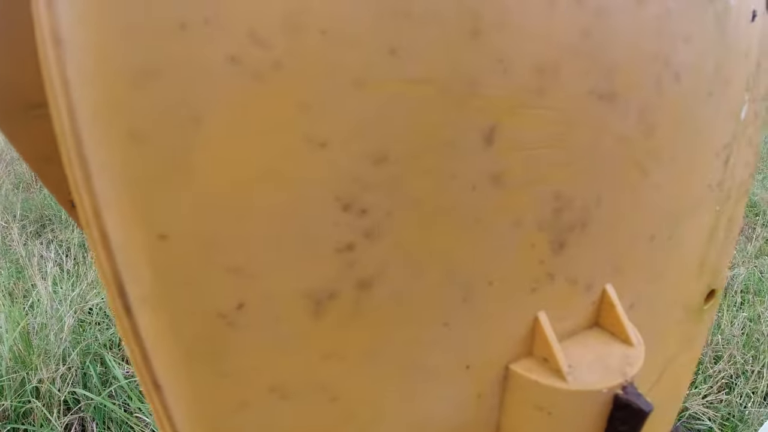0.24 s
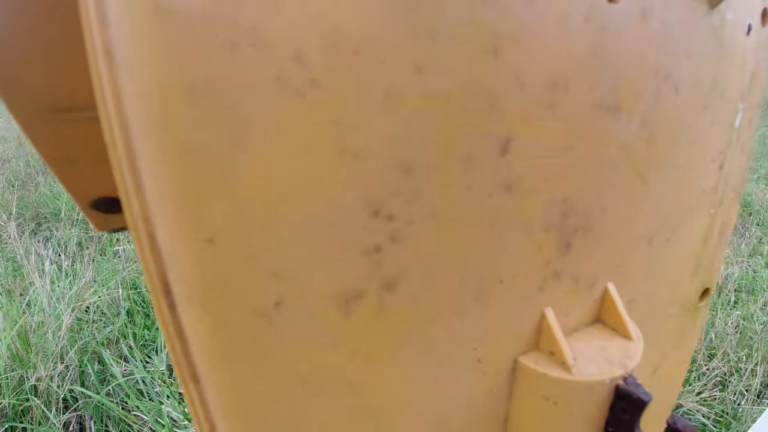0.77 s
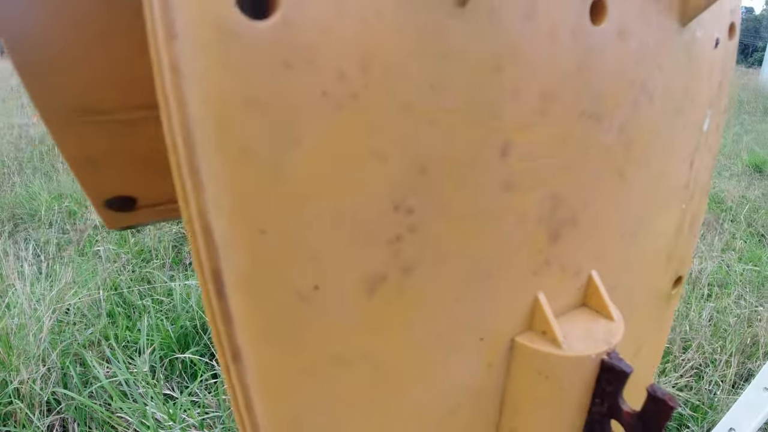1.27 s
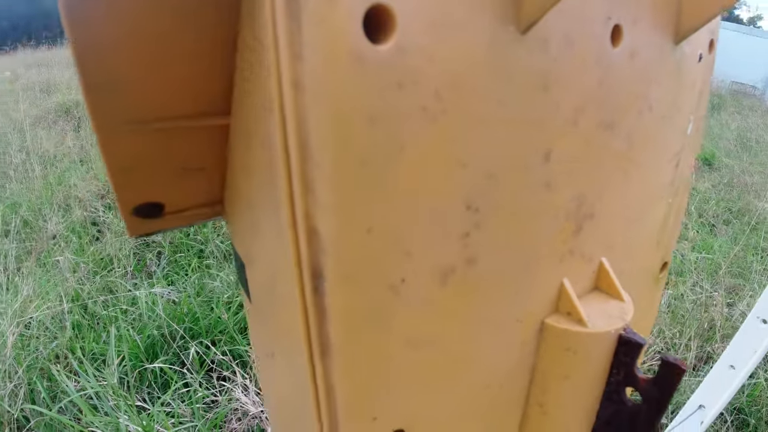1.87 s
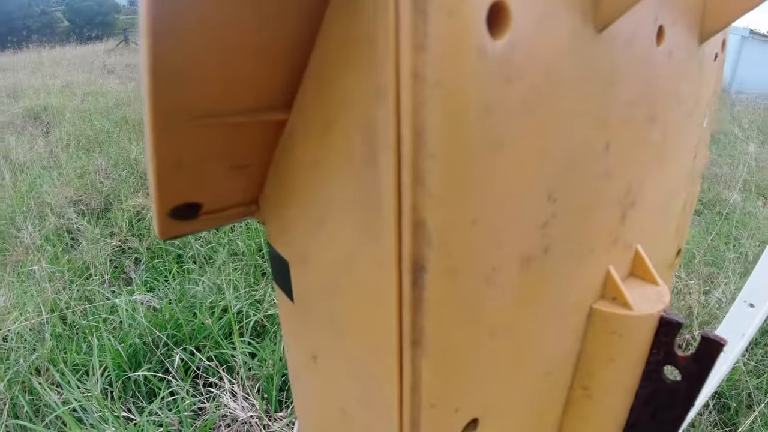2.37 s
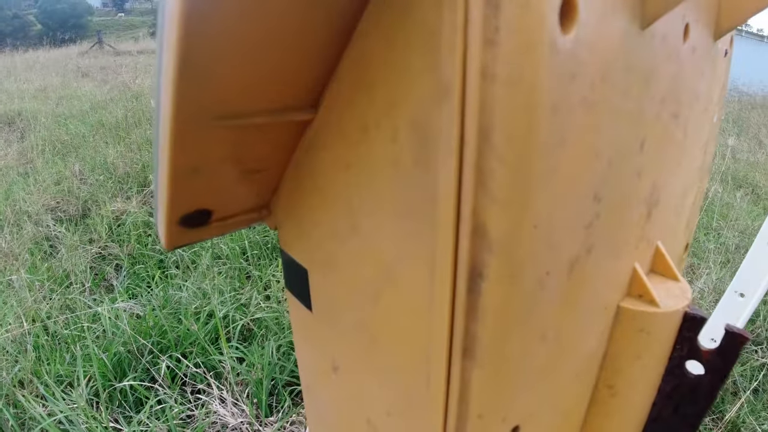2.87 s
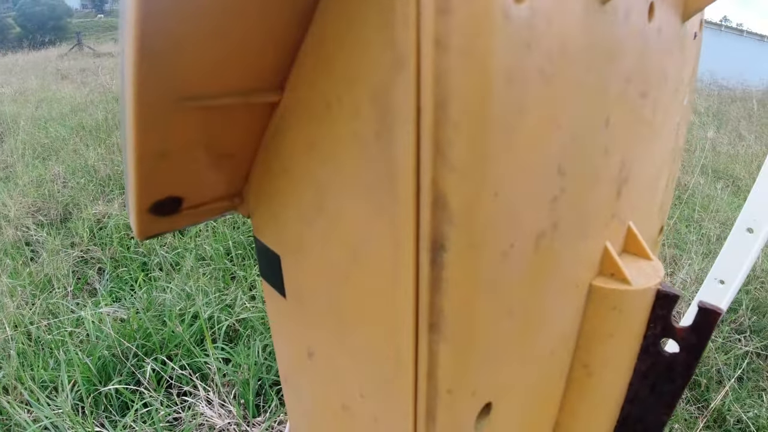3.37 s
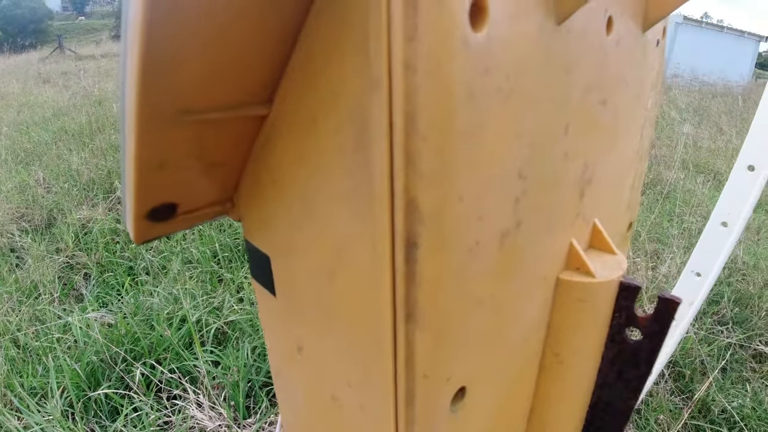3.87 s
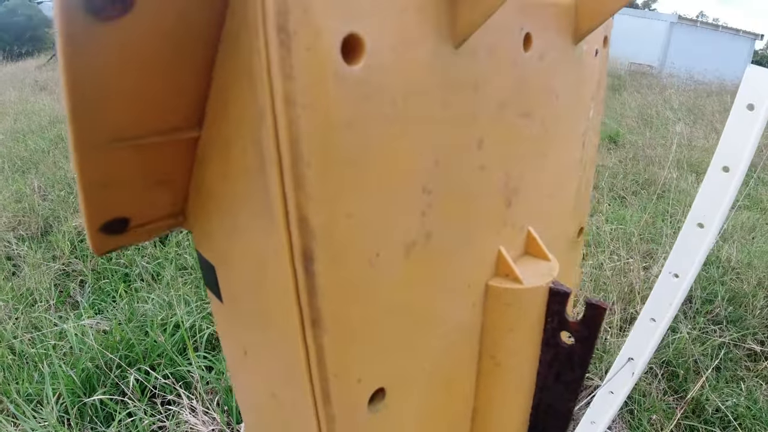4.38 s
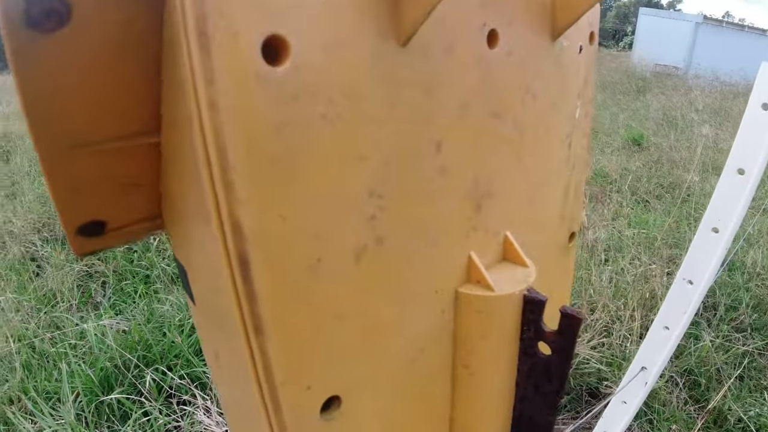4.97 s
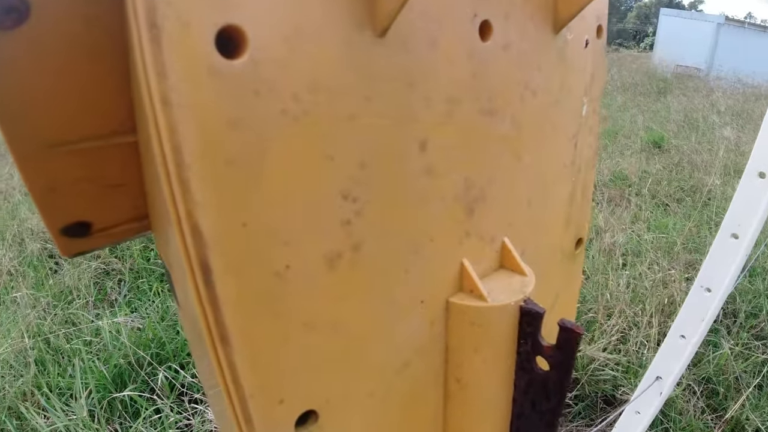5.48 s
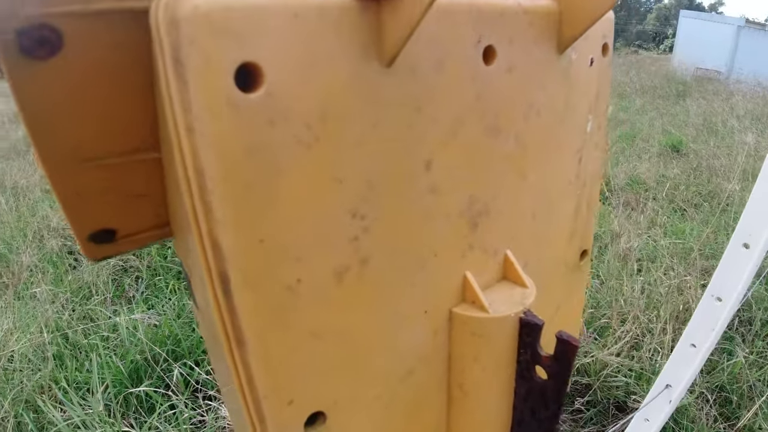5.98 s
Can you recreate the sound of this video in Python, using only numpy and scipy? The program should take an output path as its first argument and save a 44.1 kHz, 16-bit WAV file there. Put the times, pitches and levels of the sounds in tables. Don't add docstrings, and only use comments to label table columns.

```python
import sys
import numpy as np
from scipy import signal
from scipy.fft import rfft, irfft, next_fast_len
from scipy.io import wavfile
from scipy.ndimage import map_coordinates

SR = 44100
rng = np.random.default_rng(int(sys.argv[2]) if len(sys.argv) > 2 else 0)


def inscribe(sig):
    pcm = np.round(np.clip(np.atleast_2d(sig).T, -1, 1) * 32767)
    wavfile.write(sys.argv[1], SR, pcm.astype(np.int16))


def ratio(d):
    e = np.asarray(d, float) / 20
    return 10 ** e


N = 275184


def unit(x):
    return x / np.sqrt(np.mean(x ** 2) + 1e-20)


def curves(rows):
    s, *cols = np.transpose(rows)
    return [np.interp(np.arange(N) / SR, s, c) for c in cols]


def wobble(rate):
    knots = rng.standard_normal(int(N * rate / SR) + 4)
    return map_coordinates(knots, [np.arange(N) * rate / SR])


def filtered(x, response):
    m = next_fast_len(N + 8192)
    hz = np.fft.rfftfreq(m, 1 / SR) + 1e-3
    return irfft(rfft(x, m) * response(hz), m)[:N]


def band(centre_hz, width_hz):
    noise = rng.standard_normal(N)
    return unit(filtered(noise, lambda f: 1 / (1 + ((f - centre_hz) / width_hz) ** 4)))


def add(out, s, sound):
    part = out[round(s * SR):][:len(sound)]
    part += sound[:len(part)]


# (f/Hz, level/dB per Hz)
RUSTLE = [(60, -23.5), (120, -6.5), (220, -13), (300, -18.5), (570, -19), (780, -24.5), (980, -21.5),
          (1300, -29.5), (2200, -25.5), (2800, -34), (5200, -42), (6000, -43.5), (12600, -51),
          (13200, -81.5)]
# (f/Hz, width/Hz, level/dB)
ENGINE = [
    (43.6, 4.9, -53),
    (101.5, 11, -53),
    (131, 9.2, -71),
]


def paddock():
    hz, db = np.transpose(RUSTLE)
    noise = rng.standard_normal(N)
    rustle = unit(filtered(noise, lambda f: ratio(np.interp(np.log(f), np.log(hz), db))))
    hum = sum(ratio(level + 1.2 * wobble(2.0)) * band(c, w) for c, w, level in ENGINE)
    sway_db = 0.9 * wobble(5.8) + 0.6 * wobble(1.1)
    return ratio(-51.0 + sway_db) * rustle + hum


# (t/s, level/dB)
GUSTS = [(0.0, -35), (1.08, -36.5), (2.55, -36), (2.64, -20), (2.92, -32), (4.0, -39), (4.15, -24),
         (4.54, -34.5), (4.68, -21), (4.97, -38.5), (5.07, -27.5), (5.58, -33), (5.7, -16), (6.05, -37.5),
         (6.24, -34.5)]
# (t/s, f/Hz, level/dB, t60/s)
BUMP = [
    (4.072, 125.3, -10.5, 0.14),
    (4.091, 65.5, -6.5, 0.074),
    (4.099, 37.7, -16, 0.66),
]


def wind():
    buffet_db, = curves(GUSTS)
    rumble_db = -46 + 0.71 * (buffet_db - buffet_db.mean())
    out = ratio(buffet_db) * band(10.7, 9.6) + ratio(rumble_db) * band(43, 20)
    t = np.arange(SR // 2) / SR
    for s, hz, db, t60 in BUMP:
        onset = 1 - np.exp(-t / 0.0061)
        add(out, s, ratio(db - 60 * t / t60) * onset * np.sin(2 * np.pi * hz * t))
    return out


def sputter(modes, grain_db):
    def housing(f):
        return sum(ratio(db) / (1 + ((f - c) * t60 / 2) ** 2) for c, db, t60 in modes)
    grainy = ratio(grain_db * wobble(170)) * rng.standard_normal(N)
    return unit(filtered(grainy, housing))


def stray_grains(count, spread_db, cycles):
    when, pitch, size = rng.random((count, 3)).T[:, :, None]
    turns = 2600 * 3.2 ** pitch * np.arange(SR // 100) / SR
    level = ratio(-11 * pitch - spread_db * np.log(size + 1e-3))
    grains = level * turns * np.exp(-turns / cycles) * np.sin(2 * np.pi * turns)
    place = (when * N).astype(int) + np.arange(turns.shape[1])
    return unit(np.bincount(place.ravel(), grains.ravel(), N)[:N])


# (t/s, level/dB)
FAINT_CREAK = [
    (0.0, -42.5),
    (0.29, -54),
    (6.12, -58),
    (6.24, -56),
]


def faint_creak(crackle):
    linger = ratio(-60 * np.arange(SR // 3) / SR / 0.082)
    busy = np.sqrt(np.abs(signal.fftconvolve(crackle ** 2, linger / linger.sum())[:N]))
    floor_db, = curves(FAINT_CREAK)
    level = ratio(floor_db - 7.5 + 3.4 * wobble(46)) + ratio(-39.5) * busy
    hiss = ratio(-6.5) * sputter(RIBS[2:], grain_db=3.5)
    hiss = hiss + sputter(EDGES[:5], grain_db=6)
    hiss = hiss + ratio(-15 + 1.3 * wobble(1.5)) * sputter(EDGES[5:], grain_db=9.0)
    return level * hiss + ratio(floor_db - 13) * stray_grains(count=250, spread_db=0.5, cycles=1.6)


# (t/s, peak level/dB, sizzle of ribs and edges/dB re peak)
DEEP_CREAKS = [(.0204, -13, -3.5), (.1015, -10.5, -11.5), (.157, -11, 1.5), (.1791, -8, -8),
               (.1847, -7.5, -17), (.269, -14, -11), (.2919, -13.5, -1.5), (.4987, -16.5, 6),
               (.6758, -8.5, -8.5), (.6973, -22, -6.5), (1.0515, -22.5, 1.5), (1.1829, -14, 1),
               (1.6397, -17.5, 2.5), (1.6608, -12.5, -4.5), (1.6757, -5.5, -14.5), (1.6822, -15.5, -6),
               (2.6272, -42, 2), (2.8149, -16, -3.5), (3.281, -12, 0), (4.1046, -6.5, -5.5),
               (4.2328, -6.5, -14), (4.2723, -35, -5), (4.5684, -18.5, -1), (4.6157, -11.5, -4.5),
               (5.1969, -13, -3.5), (5.2071, -19, -15), (6.0141, -7.5, -6.5), (6.2105, -10, -6.5)]
# (t/s, peak level/dB, sizzle of ribs and edges/dB re peak)
CORNER_CREAKS = [(.0646, -19, 1.5), (.2008, -11, -4.5), (.5345, -14.5, -4), (.681, -11, -6.5),
                 (.7268, -14, -7), (1.232, -11.5, -4.5), (2.6366, -7, -12.5), (2.7766, -18, -9.5),
                 (3.1173, -17, -7), (3.1458, -23.5, -4.5), (4.0134, -13.5, -10.5), (4.1092, -7, -10.5),
                 (4.1243, -12, -2), (4.172, -12.5, -7), (4.1802, -11.5, -12), (4.2397, -29, 7),
                 (4.2842, -4.5, -9.5), (4.5411, -24, -15), (4.5455, -10.5, -9.5), (4.5583, -8.5, -9),
                 (4.631, -17, -1), (4.7187, -21, -6), (4.9598, -20.5, 1.5), (5.1506, -7.5, -9.5),
                 (5.2456, -12.5, -11.5), (5.2928, -12.5, -11), (5.3036, -14.5, 0), (5.4437, -23.5, 2),
                 (5.6321, -16.5, -9.5), (6.0536, -7.5, -4.5)]
# (t/s, peak level/dB, sizzle of ribs and edges/dB re peak)
FRONT_CREAKS = [(.0493, -11, -16), (.1901, -6, -12), (.2103, -2.5, -16), (.4348, -10.5, -9.5),
                (.4407, -6, -17), (.4478, -13.5, -8), (.4542, -21, -10), (.4668, -13, -1),
                (.4823, -13, -9.5), (.4902, -13.5, -5), (.543, -7, -17), (.5864, -14.5, -5.5),
                (.7381, -9, -12), (.8147, -16, -6.5), (.8251, -12, -11.5), (1.244, -10, -10.5),
                (1.2575, -9.5, -10), (1.8593, -12.5, -23), (1.8667, -17.5, -9), (1.8759, -26, -21),
                (2.0765, -14, -16.5), (2.3741, -7.5, -19), (2.393, -20.5, -8.5), (2.4738, -14.5, -12.5),
                (2.487, -14.5, -19), (2.5002, -24, -16), (2.9117, -5.5, -7.5), (2.9316, -31, -7),
                (4.2914, -22.5, -1), (4.3199, -10, -12.5), (4.7874, -11, -19), (4.794, -13, -8.5),
                     (4.8878, -7, -10), (4.8936, -16.5, -6), (4.952, -9.5, -11), (4.976, -9, -14),
                     (5.07, -13, -11), (5.4115, -16.5, -8), (5.423, -7, -4.5), (5.4297, -20.5, -4),
                     (5.4341, -7, -11.5), (5.4371, -13, -3.5), (5.4496, -19.5, -4), (5.456, -30, -12),
                     (5.4649, -12.5, -8), (5.7068, -12, -12.5), (5.7245, -30, -4), (5.9639, -8.5, -19),
                     (5.9798, -30, 3), (6.0282, -13.5, -11)]
# (t/s, peak level/dB, knock of the walls/dB re peak)
RIB_CREAKS = [(.0339, -28, -19), (0.1362, -28, -16), (.1947, -28, -10), (0.3485, -16.5, -16),
              (.3761, -40, -12), (.4106, -38, -17), (0.473, -21, -16), (0.6019, -14.5, -5),
              (.771, -19, -29), (1.0724, -26, -13), (1.105, -32, -15), (1.1262, -23.5, -5),
              (1.2, -22, -18), (1.5653, -17.5, -12.5), (1.5754, -20.5, -9), (2.142, -33.5, -14),
              (2.399, -30, -8), (2.6674, -20, -10), (2.9532, -14, -26), (3.1626, -17.5, -32),
              (3.2037, -17, -20), (3.3363, -30.5, -27), (3.8765, -40.5, -27),
              (4.0567, -20, -7), (4.0619, -32, -23), (4.187, -21.5, -3), (4.2485, -19, -10),
                   (4.3848, -19, -20.5), (4.5327, -22.5, -10), (4.6219, -30, 8), (4.6377, -23, -20),
                   (4.8223, -23.5, -20), (4.922, -15.5, -15), (4.9634, -17.5, -11), (5.176, -16.5, -5.5),
                   (5.214, -18.5, -6), (5.417, -23, 4.5), (5.4723, -21.5, -8), (5.663, -28.5, -11),
                   (5.752, -18, -8), (5.766, -16, -5), (5.774, -25, -20), (5.8473, -20, -11.5),
                   (6.0647, -19.5, -2.5)]
# (t/s, peak level/dB)
EDGE_TICKS = [(.6587, -28), (.9186, -41.5), (2.2362, -47), (2.2739, -36.5), (2.322, -41), (2.9413, -44),
              (3.8754, -32.5), (3.9816, -49), (4.0845, -35.5), (4.0935, -39.5), (5.5905, -43),
              (5.6448, -32), (5.8164, -39), (6.121, -57)]


def slips():
    deep, corner, front = (-1.5, -4, -3.5, -10), (-3.5, -0.5, -1, -9.5), (-13, -0.5, 0, -9.5)
    ribbed, edge = (-6, 2.5, 2, -13.5), (-14, -19, -10.5, -1.5)
    front_creaks = FRONT_CREAKS
    found = []
    for rows, spread in [(DEEP_CREAKS, deep), (CORNER_CREAKS, corner), (front_creaks, front)]:
        for s, db, sizzle_db in rows:
            found.append((s, db + np.add(spread, [0, 0, sizzle_db, sizzle_db])))
    for s, db, knock_db in RIB_CREAKS:
        found.append((s, db + np.add(ribbed, [knock_db, knock_db, 0, 0])))
    for s, db in EDGE_TICKS:
        found.append((s, db + np.array(edge)))
    return found


def rings(count, modes, slip_s, split, cycles, crowd, crowd_db, snap):
    t = np.arange(SR // 7) / SR
    hz, db, t60 = np.repeat(np.transpose(modes), 6, axis=1)[:, :, None]
    near = np.resize([[-split], [split], [-crowd], [crowd], [-2.3 * crowd], [2.267 * crowd]], hz.shape)
    weak = crowd_db * np.resize([[0], [0], [1], [1], [1], [1]], hz.shape)
    swell = (1 - np.exp(-t * hz / cycles)) ** 2
    shapes = ratio(db + weak - 60 * t / t60) * swell * np.sin(2 * np.pi * hz * (1 + near) * t)
    shapes *= np.resize([[1], [1], [-1], [1], [1], [-1]], hz.shape)
    strengths = ratio(2.4 * rng.standard_normal((count, len(hz))))
    life = t[:SR // 30] / slip_s
    drive = rng.standard_normal((count, len(life))) * np.sqrt(life) * np.exp(-life)
    drive += snap * np.sqrt(slip_s * SR) * (life == 0)
    ring = signal.fftconvolve(strengths @ shapes, drive, axes=1)[:, :len(t)]
    return ring / np.abs(ring).max(axis=1, keepdims=True)


# (f/Hz, level/dB, t60/s)
SHELL = [(207.5, -14, 0.11), (279, -24, 0.081), (374, -9, 0.12), (495, -16, 0.11), (560.2, -1, 0.11),
         (659.4, -2, 0.1)]
PANEL = [(923, -5, 0.066), (965.7, 3, 0.052), (1035.8, -4.5, 0.066), (1134, -20, 0.078), (1196, -16, 0.089),
         (1488, -19.5, 0.064)]
RIBS = [(1556, -9, 0.059), (1700, -12, 0.023), (1855.5, 1.5, 0.019), (1998, 4.5, 0.02), (2120, -5, 0.036),
        (2507, -12, 0.018), (2595, -15, 0.01)]
EDGES = [(3240, -14.5, 0.044), (3257, -1.4, 0.021), (3688, -4, 0.019), (4308, -8.5, .021),
         (4878, -6.5, 0.013), (5490, -17.5, .017), (6220, -20, 0.018), (6990, -19, 0.013),
         (7350, -21, 0.022), (8340, -22.5, 0.013), (8780, -25, 0.0047), (10710, -30.5, .013),
         (12200, -34.5, 0.0093)]


def creaks():
    events = slips()
    n = len(events)
    shell = rings(n, SHELL, slip_s=0.00081, split=0.012, cycles=0.27, crowd=.05, crowd_db=-18, snap=.45)
    panel = rings(n, PANEL, slip_s=.0018, split=0.012, cycles=0.92, crowd=.045, crowd_db=-14, snap=0.26)
    ribs = rings(n, RIBS, slip_s=0.0014, split=0.013, cycles=0.94, crowd=.035, crowd_db=-8, snap=0.099)
    edges = rings(n, EDGES, slip_s=0.00096, split=0.0084, cycles=1.2, crowd=.03, crowd_db=-8, snap=.15)
    parts = [ratio(0.2) * shell, ratio(1.43) * panel, ratio(1.86) * ribs, ratio(2.5) * edges]
    out = np.zeros(N)
    for k, (s, levels) in enumerate(events):
        add(out, s, sum(ratio(db) * part[k] for db, part in zip(levels, parts)))
    return out


def cavity(x):
    t = np.arange(SR // 8) / SR
    tails = rng.standard_normal((2, len(t))) * ratio(-60 * t / 0.041)
    a, b = signal.fftconvolve(x[None], tails / np.linalg.norm(tails[0]), axes=1)[:, :N]
    turn = 2 * wobble(9)
    return x + ratio(-8.5) * (np.cos(turn) * a + np.sin(turn) * b)


# (t/s, length/s, start f/Hz, end f/Hz, level/dB)
WHISTLES = [
    (1.712, 0.026, 5200, 5350, -61),
    (1.728, .016, 5000, 3200, -55),
    (1.74, 0.016, 3020, 3080, -43),
    (2.15, 0.15, 2990, 3100, -62),
    (2.275, 0.13, 3220, 3290, -56),
    (2.31, 0.08, 4440, 4450, -58.5),
    (3.645, 0.023, 2930, 3030, -53),
    (3.94, 0.026, 2740, 2970, -53),
]


def wildlife():
    out = np.zeros(N)
    calls = list(WHISTLES)
    beats = np.arange(.155, N / SR, .2387)
    chance = rng.standard_normal((30, 2))
    for s, (late, loud) in zip(beats, chance):
        calls.append((s + .012 * late, .035, 14050, 14150, -72 + 5.5 * loud))
    for s, length, start_hz, end_hz, db in calls:
        n = int(length * SR)
        jitter = 1 + 0.022 * rng.standard_normal(n)
        glide = np.cumsum(np.linspace(start_hz, end_hz, n) * jitter) / SR
        add(out, s, ratio(db) * np.sqrt(np.hanning(n)) * np.sin(2 * np.pi * glide))
    return out


# (t/s, peak level/dB)
SNAPS = [
    (0.816, -58.5),
    (3.887, -50),
    (5.554, -55),
    (6.055, -47),
]


def snaps():
    out = np.zeros(N)
    t = np.arange(SR // 100) / SR
    for s, db in SNAPS:
        bright = np.diff(rng.standard_normal(len(t) + 2), n=2)
        add(out, s, ratio(db - 60 * t / .004) * bright)
    return out


# (t/s, treble level/dB)
FACING = [
    (0, 3),
    (.7, 2),
    (1.3, 7),
    (1.6, -4),
    (3.95, 0),
    (4.2, 2.5),
    (4.4, -0.5),
    (5.2, 4),
    (6.24, -2),
]


def vents(x):
    top = signal.sosfilt(signal.butter(2, 5600, "high", fs=SR, output="sos"), x)
    treble_db, = curves(FACING)
    return x + (ratio(treble_db) - 1) * top


def scene():
    no_bass = signal.butter(2, 170, "high", fs=SR, output="sos")
    crackle = signal.sosfilt(no_bass, cavity(creaks()))
    beamed = vents(crackle + faint_creak(crackle) + paddock())
    return (beamed + snaps() + wind() + wildlife())[None]


def band_limit(x):
    return signal.sosfilt(signal.butter(12, 16200, fs=SR, output="sos"), x)


def record(dry):
    heard = filtered(dry[0], lambda f: 1 / np.sqrt(1 + (f / 13500) ** 8))[None]
    held = heard / (1 + np.abs(heard) ** 12) ** (1 / 12)
    return band_limit(held)


dry = scene()
out = record(dry)
inscribe(out)
```